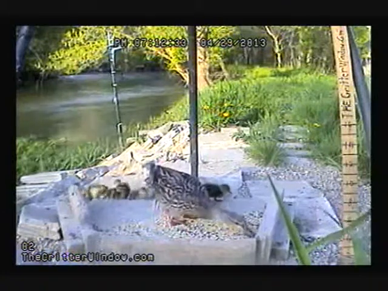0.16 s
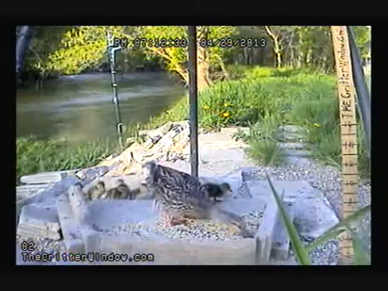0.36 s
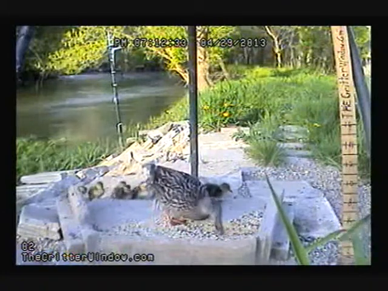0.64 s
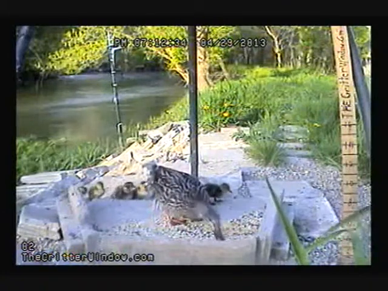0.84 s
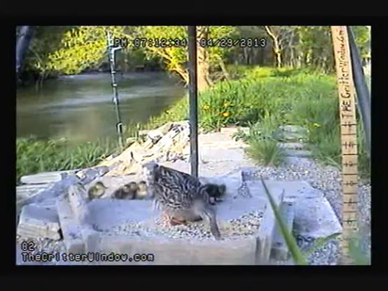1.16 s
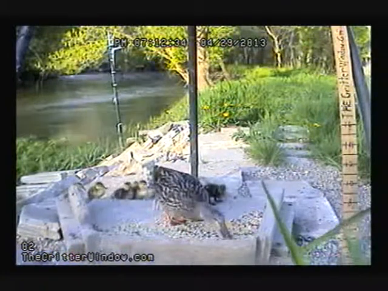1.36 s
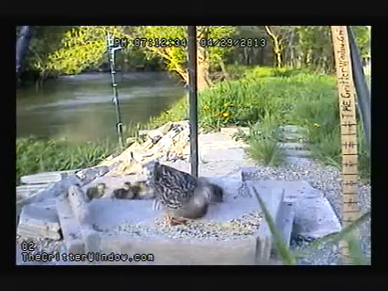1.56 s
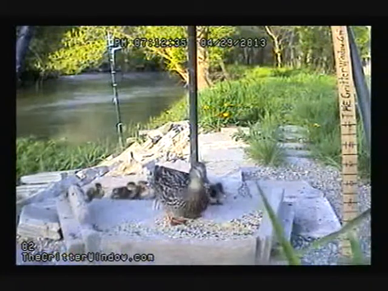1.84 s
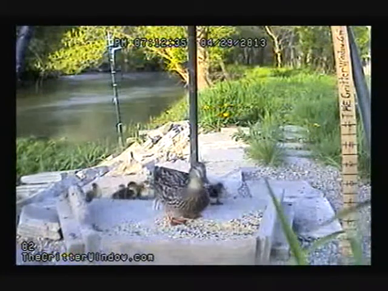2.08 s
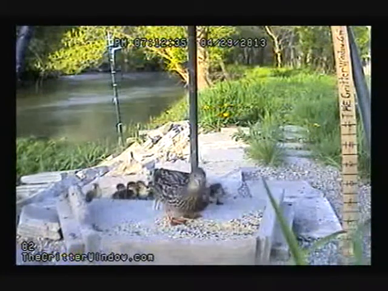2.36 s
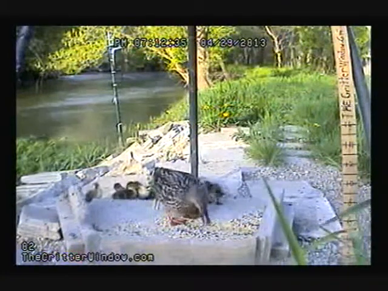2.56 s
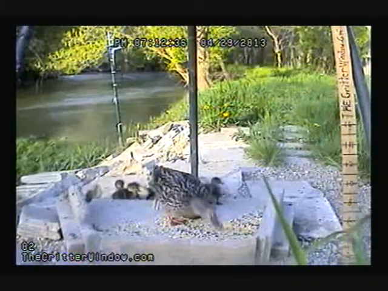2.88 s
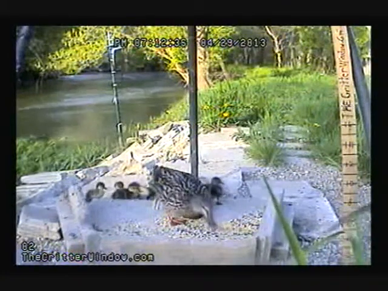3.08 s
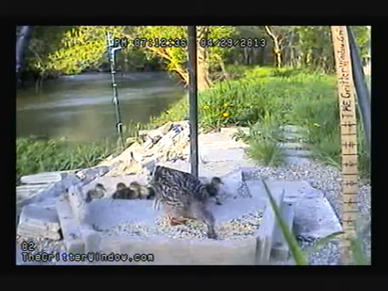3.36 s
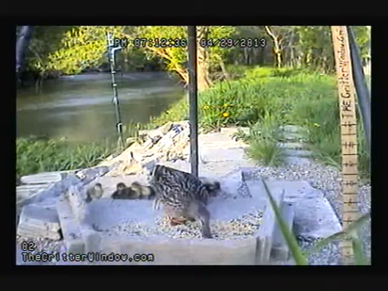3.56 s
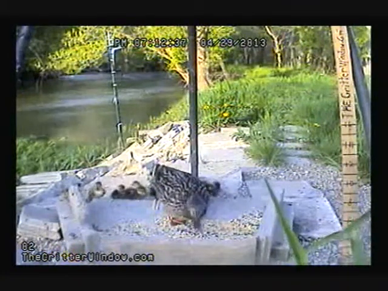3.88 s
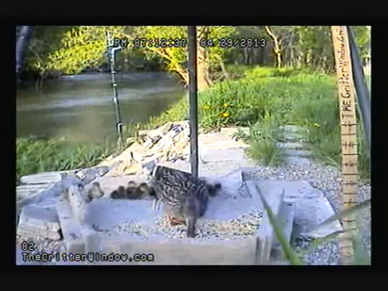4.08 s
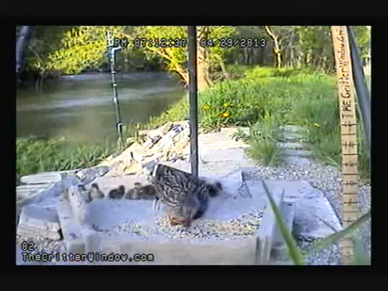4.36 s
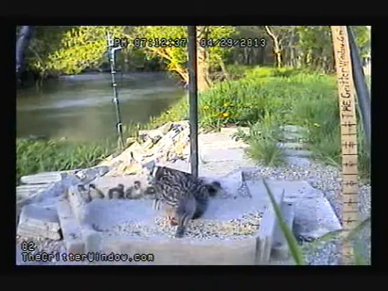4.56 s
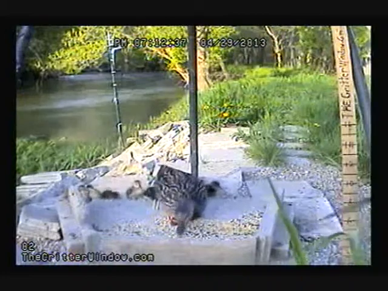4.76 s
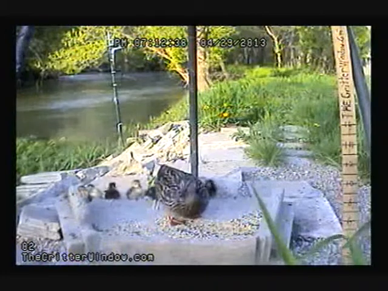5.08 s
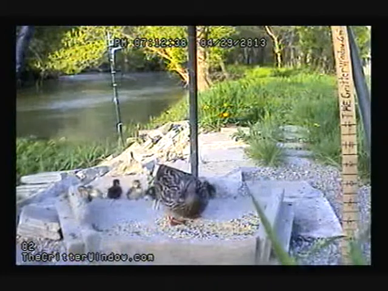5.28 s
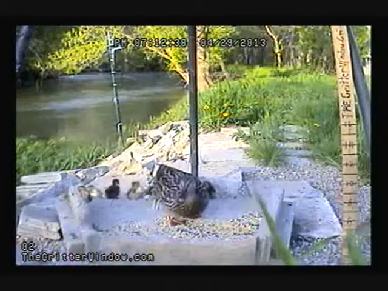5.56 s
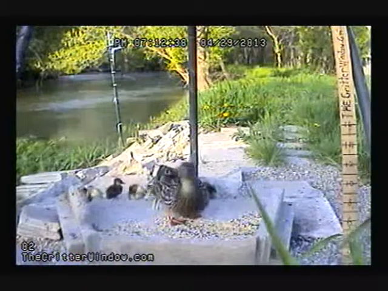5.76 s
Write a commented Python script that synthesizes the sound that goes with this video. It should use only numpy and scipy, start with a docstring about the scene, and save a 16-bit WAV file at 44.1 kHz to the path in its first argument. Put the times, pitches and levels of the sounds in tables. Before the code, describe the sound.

Ducklings give short, high, sliding peeps throughout. Close to the microphone, a mother duck makes thin rising whines and soft clucks, and her bill ticks and scrapes in grain and grit. A river rushes steadily behind them over a low hum, and a songbird calls faintly far away. Near the end a gust thumps the microphone and rustles the grass.

```python
"""On a river bank, a mallard hen feeds on spilled grain while her ducklings whistle short peeps.
Pulses in her throat make soft clucks, and the two sides of her voice box sing a thin, two-voiced whine.
Her bill ticks and scrapes in the grain, and loose grit crackles. The river rushes over a low hum,
a songbird calls far away, and near the end a gust buffets the microphone and rustles the grass."""
import sys
import numpy as np
from scipy import signal
from scipy.fft import rfft, irfft
from scipy.io import wavfile
from scipy.ndimage import uniform_filter1d

SR = 44100
rng = np.random.default_rng(int(sys.argv[2]) if len(sys.argv) > 2 else 0)


def dump(signal):
    """Clip the signal to [-1, 1] and save it as 16-bit WAV at the path in sys.argv[1]."""
    limited = np.clip(np.atleast_2d(signal).T, -1, 1)
    pcm = np.round(limited * 32767).astype(np.int16)
    wavfile.write(sys.argv[1], SR, pcm)


N = 261513
TIME = np.arange(N) / SR


def gain(db):
    """Turn decibels into a number to multiply by."""
    return 10 ** (np.asarray(db) / 20)


def unit(x):
    """Scale a sound so its average strength (rms) is 1."""
    return x / np.sqrt(np.mean(x ** 2))


def add(out, start, x):
    """Mix x into out, beginning at start seconds."""
    i = max(int(start * SR), 0)
    out[i:i + len(x)] += x[:max(N - i, 0)]


def band(x, hz, width_hz):
    """A resonance: keep what is near hz and weaken the rest."""
    return signal.lfilter(*signal.iirpeak(min(hz, .45 * SR), hz / min(width_hz, .3 * SR), fs=SR), x)


def lowpass(x, hz):
    """Soften the treble above hz."""
    return signal.sosfilt(signal.butter(2, min(hz, .45 * SR), fs=SR, output="sos"), x)


def wander(rate, n):
    """A smooth random wobble about 1 in size, heading for a new value rate times a second."""
    hold = max(int(SR / rate), 2)
    steps = np.repeat(rng.standard_normal(n // hold + 1), hold)
    return 1.3 * uniform_filter1d(uniform_filter1d(steps, hold), hold)[:n]


def shaky_phase(hz, jitter, rasp=0.014):
    """The phase of a tone whose pitch trembles (jitter) and shivers much faster (rasp)."""
    pitch = hz * (1 + jitter * wander(173.8, len(hz)) + rasp * wander(1800, len(hz)))
    return 2 * np.pi * np.cumsum(pitch) / SR


def swell(middle_s, width_s):
    """A smooth rise and fall, 1 at its middle."""
    return np.exp(-((TIME - middle_s) / width_s) ** 2)


def contacts(n, spread_db):
    """The noise of many tiny touches of very unequal size."""
    return rng.standard_normal(n) * gain(spread_db * np.minimum(rng.exponential(size=n), 6))


# The tone colour of the river and air. Each row: frequency in Hz, relative level in dB.
RIVER_COLOUR = [(25, -15), (62, 0), (100, -2), (230, -16.5), (420, -18), (640, -19.5), (900, -11.5),
                (1300, -13), (1700, -16.5), (3300, -22), (4100, -25), (6200, -39.5), (10000, -42.5),
                (12000, -43.5)]


def river(level_db=-42.5, flicker_db=1.5, surge_db=.5):
    """Rushing water: each half octave flickers alone, while the middle and treble swell together."""
    out = np.zeros(N)
    freqs = np.maximum(np.fft.rfftfreq(N, 1 / SR), 1)
    hz, db = np.transpose(RIVER_COLOUR)
    spectrum = rfft(rng.standard_normal(N)) * gain(np.interp(np.log(freqs), np.log(hz), db))
    half_octave = np.floor(2 * np.log2(np.maximum(freqs, 32)))
    surge = surge_db * wander(2, N)
    for k in np.unique(half_octave):
        water = irfft(spectrum * (half_octave == k), N)
        out += water * gain(flicker_db * wander(14, N) + surge * (2 ** (k / 2) > 400))
    return unit(out) * gain(level_db)


# The tones of the low hum. Each row: pitch in Hz, level in dB.
HUM_TONES = [(89.4, -51), (119, -55.5), (179, -65)]


def hum(waver=0.0122, throb_db=2.5):
    """Low tones waver in pitch and strength."""
    out = np.zeros(N)
    for hz, db in HUM_TONES:
        strength = np.sqrt(2) * gain(db + throb_db * wander(6, N))
        pitch = hz * (1 + waver * wander(5, N))
        out += strength * np.sin(2 * np.pi * np.cumsum(pitch) / SR)
    return out


# Bouts of shuffling in the grit. Each row: middle in seconds, half length in seconds, level in dB.
GRIT_SHUFFLES = [(1.494, 0.095, -64), (2.033, 0.31, -57), (3.896, 0.6, -71.5), (4.65, 0.27, -68),
                 (5.75, 0.44, -50.5)]


def grit_crackle(bits_per_s=330, spread_db=3, fade_s=0.0063, rest_db=-65.5):
    """Bits of grit shift at random, each a tiny burst of noise; a faint crackle stays between bouts."""
    shifts = rng.random(N) < bits_per_s / SR
    sizes = shifts * gain(spread_db * np.minimum(rng.exponential(size=N), 3))
    fades = signal.lfilter([1], [1, -np.exp(-1 / (fade_s * SR))], sizes)
    bursts = band(fades * rng.standard_normal(N), hz=4200, width_hz=5500)
    shuffling = sum(gain(db) * swell(middle, width) for middle, width, db in GRIT_SHUFFLES)
    return unit(lowpass(bursts, 10400)) * (gain(rest_db) + shuffling)


# The ducklings' peeps. Each row: time of the highest pitch in seconds, that pitch in Hz, rise and
# fall in seconds, slide speed in octaves a second, level in dB before trim_db is added.
DUCKLING_PEEPS = [(0, 3120, 0.0026, 0.021, 17, -43.5), (.312, 4000, .005, 0.036, 9, -47),
                  (.34, 3500, 0.045, 0.052, 12, -45), (.548, 4050, .001, 0.057, 15.5, -39.5),
                  (.675, 3550, .02, 0.058, 7.1, -48), (.936, 4230, .001, 0.069, 12.4, -38),
                  (1.004, 2860, .018, 0.016, 5.8, -39.5), (1.389, 2830, 0.021, .022, 6.6, -46),
                  (1.59, 3950, .003, 0.04, 9, -47), (1.612, 3000, .025, 0.035, 11, -46.5),
                  (1.889, 4040, .003, 0.042, 8.3, -44), (2.178, 3486, 0.032, 0.039, 8.1, -36),
                  (2.19, 3740, .005, .026, 4.1, -44), (2.212, 3187, 0.03, 0.025, 11, -39.5),
                  (2.355, 3150, .045, 0.0054, 8.5, -49), (2.452, 4400, .015, 0.021, 6, -49.5),
                  (2.473, 4010, .003, 0.053, 13.3, -37.5), (2.532, 3020, 0.013, 0.023, 13, -48),
                  (2.604, 2960, .003, 0.064, 5.5, -44.5), (2.748, 4240, 0.029, 0.056, 8.8, -47),
                  (2.845, 3020, .01, 0.045, 10.4, -42), (3.032, 4270, .012, 0.06, 8.2, -44.5),
                  (3.752, 3040, 0.0058, 0.063, 5.3, -39), (4.012, 3230, .008, 0.042, 10.5, -40),
                  (4.04, 4106, 0.029, .005, 8, -38), (4.175, 3920, 0.034, 0.004, 5, -36.5),
                  (4.348, 3360, 0.041, 0.043, 17, -48), (4.607, 3740, 0.05, 0.066, 13, -45),
                  (4.68, 2670, 0.021, 0.027, 9.5, -45), (5.175, 2880, .042, .035, 5.1, -46),
                  (5.324, 3410, .001, 0.052, 10, -36), (5.584, 3200, 0.0027, 0.036, 9.2, -44),
                  (5.601, 3740, .001, 0.046, 14, -34.5), (5.664, 3300, 0.028, 0.06, 8.8, -45)]


def ducklings(turn_s=.012, loudest_at=.63, shimmer_db=1.7, overtone_db=-36, trim_db=-1):
    """Each peep is an almost pure whistle that slides up, rounds off and slides down."""
    out = np.zeros(N)
    for top_s, top_hz, rise, fall, slide, db in DUCKLING_PEEPS:
        t = np.arange(-rise, fall, 1 / SR)
        octaves_down = slide * (np.hypot(t, turn_s) - turn_s)
        phase = shaky_phase(top_hz * 2 ** -octaves_down, jitter=0.0059, rasp=0.017)
        tone = np.sin(phase) + gain(overtone_db) * np.sin(2 * phase)
        progress = np.interp(np.linspace(0, 1, len(t)), [0, loudest_at, 1], [0, .5, 1])
        effort = np.abs(np.sin(np.pi * progress)) ** 0.91
        strength = np.sqrt(2) * gain(db + trim_db + shimmer_db * wander(207, len(t)))
        add(out, top_s - rise, tone * effort * strength)
    return out


# The resonances of the hen's throat. Each row: centre in Hz, width in Hz, relative level in dB.
THROAT_RESONANCES = [(420, 405, 5.5), (790, 1200, -16), (1960, 450, 1.5)]
# Her clucks. Each row: start in seconds, peak level in dB, fade time in seconds, treble limit in Hz.
HEN_CLUCKS = [(.2155, -25, 0.0047, 1580), (1.097, -33, 0.0069, 795), (1.9006, -29.5, .0036, 1500),
              (2.882, -39, 0.012, 600), (3.529, -32.5, 0.0028, 910), (4.106, -24.5, 0.012, 1220),
              (4.2059, -26, 0.0023, 448), (4.5078, -19.5, 0.0071, 1900), (4.6595, -29.5, 0.0047, 1100),
              (4.681, -36, .002, 600), (4.7, -31, 0.004, 500), (4.78, -29, 0.0032, 1000),
              (4.825, -31.5, .005, 520), (4.8376, -29.5, 0.0041, 450), (5.171, -30, 0.0082, 1210),
              (5.6495, -30.5, .0036, 700)]


def clucks(pulse_hz=347, unevenness=0.13):
    """A few uneven, fading pulses make the hen's throat ring."""
    out, n = np.zeros(N), SR // 12
    for start, db, fade, treble_hz in HEN_CLUCKS:
        gaps = np.abs(1 + unevenness * rng.standard_normal(16)) / pulse_hz
        times = np.cumsum(gaps) - gaps[0]
        pulses = np.zeros(n)
        pulses[np.minimum((times * SR).astype(int), n - 1)] = np.exp(-times / fade)
        throat = sum(gain(level) * band(pulses, hz, width) for hz, width, level in THROAT_RESONANCES)
        cluck = lowpass(throat, treble_hz)
        add(out, start, gain(db) * cluck / np.abs(cluck).max())
    return out


# The hen's whines. Each row: start, length, fade-in and climb time in seconds, quaver rate in Hz,
# closing drop as a share of the pitch, roughness (1 is usual); for the high voice, then the low one,
# first pitch and pitch after the climb in Hz and level in dB (the low one before low_trim_db);
# last, the high voice's octave in dB compared with that voice, before the beak shapes it.
HEN_WHINES = [(.23, 0.25, 0.0059, .118, 11.5, 0.046, 0.64, 1777, 2160, -40.5, 825, 1152, -41.5, -18.5),
              (.485, 0.057, 0.0089, 0.035, 13.5, .22, 1.1, 1760, 2147, -38, 824, 1135, -34.5, -15),
              (1.11, .24, 0.0097, 0.12, 15, .2, 0.73, 1760, 2134, -42, 867, 1207, -43.5, -18.5),
              (1.93, 0.25, 0.047, .145, 12.3, .14, 0.83, 1905, 2108, -35.5, 967, 1135, -46, -26),
              (3.203, 0.18, 0.018, 0.14, 7, 0.074, 0.85, 1130, 2020, -47, 545, 1005, -46, -15),
              (4.125, 0.32, 0.096, .19, 16.7, .1, .8, 1692, 2178, -36.5, 741, 1227, -45, -19),
              (4.517, 0.044, .012, .015, 7.6, .02, 1, 2170, 2120, -50.5, 1190, 1207, -64, -18),
              (4.664, 0.18, 0.027, 0.082, 18, .11, 0.53, 1950, 2104, -41, 1004, 1240, -54, -23),
              (5.179, 0.18, 0.059, 0.15, 14.2, .08, 0.78, 1800, 2109, -33.5, 946, 1187, -52.5, -26)]


def whines(quaver_share=.011, quaver_db=2, sag_per_s=0.105, drop_s=0.01356, release_s=0.0062,
           shimmer_db=2.52, low_trim_db=-3, sum_tone_db=-18):
    """The two sides of the hen's voice box each make a tone; they climb, quaver and drop together."""
    out = np.zeros(N)
    for (start, length, attack, climb, quaver_hz, drop, rough,
         high_from, high_to, high_db, low_from, low_to, low_db, octave_db) in HEN_WHINES:
        t = np.arange(0, length, 1 / SR)
        climb_left = np.maximum(1 - t / climb, 0) ** 2
        quaver = np.cos(2 * np.pi * quaver_hz * (t - climb)) * (1 - climb_left)
        sag = sag_per_s * np.maximum(t - climb, 0)
        bend = 1 + quaver_share * quaver - sag - drop * np.exp((t - length) / drop_s)
        high_hz = (high_to + (high_from - high_to) * climb_left) * bend
        low_hz = (low_to + (low_from - low_to) * climb_left) * bend ** 1.386  # bends further
        high_phase = shaky_phase(high_hz, jitter=rough * 0.0051)
        low_phase = shaky_phase(low_hz, jitter=rough * 0.017)
        # The octave is loudest when it meets a resonance of the beak.
        octave = gain(octave_db) * band(np.sin(2 * high_phase), hz=4250, width_hz=700)
        # As the pitch climbs, strength passes from the low voice to the high one.
        high_gain = gain(high_db + 21 * np.log2(high_hz / high_to))
        low_gain = gain(low_db + low_trim_db - 8.5 * np.log2(low_hz / low_to))
        voice = high_gain * (np.sin(high_phase) + octave)
        voice += low_gain * gain(shimmer_db * wander(115.6, len(t))) * np.sin(low_phase)
        # The two sides push on each other, adding a faint tone at the sum of their pitches.
        voice += gain((high_db + low_db) / 2 + sum_tone_db) * np.sin(high_phase + low_phase)
        fades = np.clip(np.minimum(t / attack, (length - t) / release_s), 0, 1)
        tremble = gain(quaver_db * quaver + rough * shimmer_db * wander(109.6, len(t)))
        add(out, start, np.sqrt(2) * voice * fades * tremble)
    return out


# The hen's pecks. Each row: start in seconds, peak level in dB, ring pitch in Hz, ring time in seconds.
PECKS = [(1.145, -39.5, 3600, .003), (1.506, -37, 3620, 0.0016), (1.66, -35, 4000, .0019),
         (1.795, -30.5, 2560, 0.0013), (1.9005, -25, 1920, 0.0019), (1.999, -34.5, 4230, .004),
         (2.4982, -22.5, 3730, 0.0034), (2.799, -36, 4180, 0.0017), (3.1995, -25, 4230, 0.00045),
         (4.0316, -23.5, 4100, .0008), (4.658, -33, 2800, 0.0018), (5.525, -26.5, 2540, .0018),
         (5.573, -30, 4030, 0.0019), (5.682, -34, 3100, .002), (5.73, -22, 3410, .0021),
         (5.7515, -32, 2600, 0.0013), (5.782, -30, 6860, .003)]


def bill_ticks(crack_db=-5, crack_s=0.0022):
    """The bill strikes grain and grit with a dry crack and a very short ring."""
    out, t = np.zeros(N), TIME[:SR // 25]
    for start, db, hz, ring_s in PECKS:
        crack = unit(band(rng.standard_normal(len(t)), hz, 0.82 * hz)) * np.exp(-t / crack_s)
        ring = np.sin(2 * np.pi * hz * t) * np.exp(-t / ring_s)
        tick = lowpass(ring + gain(crack_db) * crack, 2 * hz)
        add(out, start, gain(db) * tick / np.abs(tick).max())
    return out


# Sweeps of the bill through the grain. Each row: start and length in seconds, level in dB, centre in Hz.
BILL_SWEEPS = [(2.354, 0.077, -31, 2780), (2.49, 0.04, -42, 3120), (4.015, 0.037, -46.5, 4200),
               (4.737, 0.054, -49.5, 5000), (5.562, 0.034, -45, 5200), (5.741, 0.041, -42, 4600)]


def bill_scrapes(upper_db=-6, bottom_hz=1600, top_hz=5600):
    """Grains rub on the bill and on each other, with a broad resonance and a weaker one above it."""
    out = np.zeros(N)
    bass_cut = signal.butter(2, bottom_hz, "high", fs=SR, output="sos")
    for start, length, db, hz in BILL_SWEEPS:
        n = int(length * SR)
        rubbing = signal.sosfilt(bass_cut, contacts(n, spread_db=2))
        rasp = band(rubbing, hz, 0.63 * hz) + gain(upper_db) * band(rubbing, 1.79 * hz, 0.19 * hz)
        arch = np.sin(np.linspace(0, np.pi, n)) ** 1.1
        add(out, start, gain(db) * unit(lowpass(rasp, top_hz)) * arch)
    return out


# A far songbird's notes. Each row: start and length in seconds, pitch in Hz, level in dB.
SONG_NOTES = [(2.495, 0.17, 3846, -48.5), (2.682, 0.22, 3880, -57.5), (2.709, 0.096, 4280, -59),
              (2.992, 0.16, 4220, -58), (3.064, 0.15, 3660, -59), (4.034, 0.15, 3935, -53.5),
              (4.144, 0.11, 4120, -49), (4.207, 0.17, 3850, -51)]


def songbird(flutter_db=4):
    """Thin, rough notes from the trees flutter after their long trip through the air."""
    out = np.zeros(N)
    for start, length, hz, db in SONG_NOTES:
        n = int(length * SR)
        tone = np.sin(shaky_phase(np.full(n, hz), jitter=0.017, rasp=0.03))
        arch = np.sin(np.linspace(0, np.pi, n))
        add(out, start, tone * arch * gain(db + flutter_db * wander(85, n)))
    return out


def gust(start_s=5.085, rise_s=.2, fade_db_per_s=3.5, rumble_db=-42.5, rustle_db=-50.5, buffet_db=-33):
    """Swirls of wind thump on the microphone while the grass around it rustles."""
    since = np.maximum(TIME - start_s, 0)
    wind = np.minimum(since / rise_s, 1) * gain(-fade_db_per_s * since)
    swirls = band(rng.standard_normal(N), hz=68, width_hz=70)
    rumble = unit(lowpass(swirls, 210))
    grass = band(contacts(N, spread_db=3), hz=1900, width_hz=8400)
    rustle = unit(lowpass(grass, 9500)) * gain(2 * wander(60, N))
    buffet = gain(buffet_db) * swell(middle_s=5.53, width_s=.085)  # the strongest swirl
    return rumble * (wind * gain(rumble_db) + buffet) + rustle * wind * gain(rustle_db)


def bank_echo(x, echo_db, decay_s):
    """Stones and trees on the bank scatter a sound, adding a short echo to it."""
    t = TIME[:SR // 2]
    echo = lowpass(rng.standard_normal(len(t)), 9000) * np.exp(-t / decay_s) * (t > .004)
    echo /= np.sqrt(np.sum(echo ** 2))
    return x + gain(echo_db) * signal.fftconvolve(x, echo)[:N]


def scene():
    """The hen is close, the ducklings a little further off, and the far songbird echoes most."""
    feeding = whines() + clucks() + bill_ticks() + bill_scrapes() + grit_crackle()
    hen = bank_echo(feeding, echo_db=-18, decay_s=0.033)
    brood = bank_echo(ducklings(), echo_db=-16.5, decay_s=0.033)
    far_bird = bank_echo(songbird(), echo_db=-3.5, decay_s=0.13)
    return (hen + brood + far_bird + river() + hum() + gust())[None]


def record(dry):
    """Cut away the treble above 12000 Hz."""
    return signal.sosfilt(signal.ellip(14, .2, 80, 12000, fs=SR, output="sos"), dry)


dry = scene()
out = record(dry)
dump(out)
```